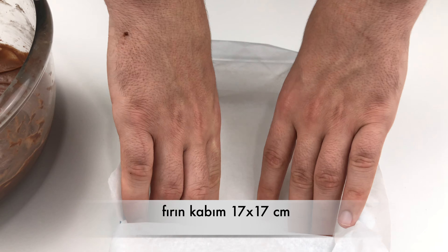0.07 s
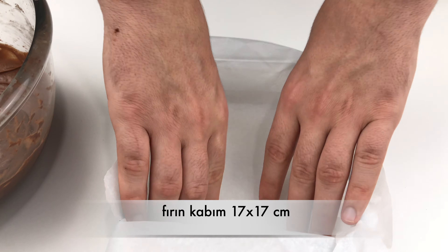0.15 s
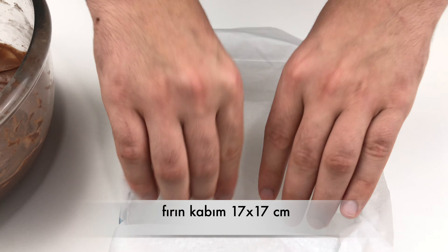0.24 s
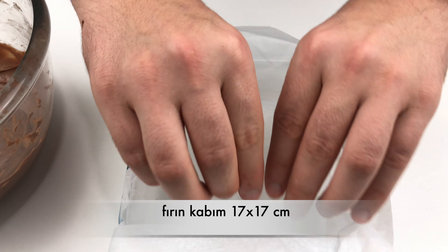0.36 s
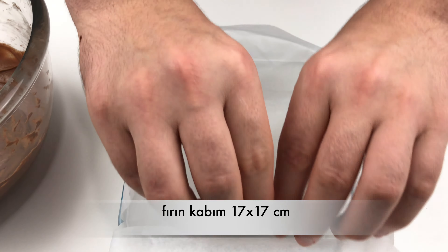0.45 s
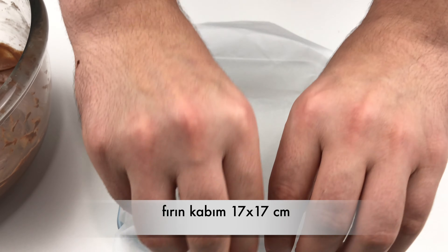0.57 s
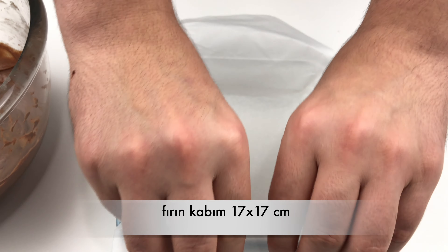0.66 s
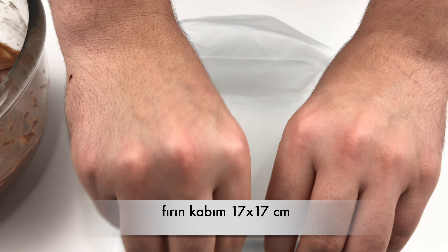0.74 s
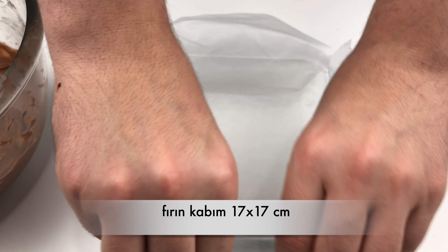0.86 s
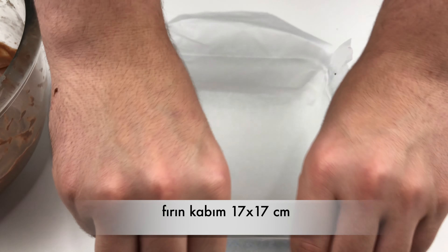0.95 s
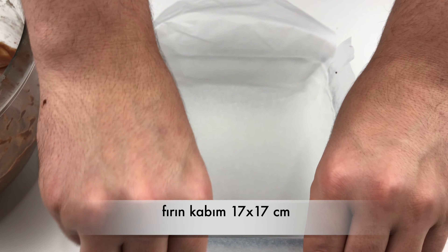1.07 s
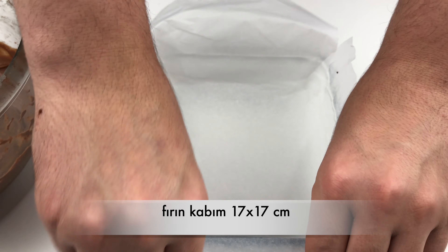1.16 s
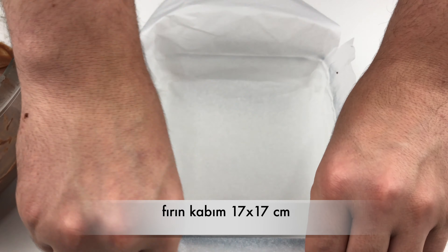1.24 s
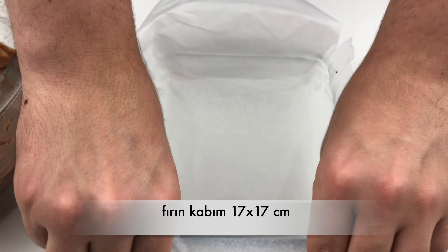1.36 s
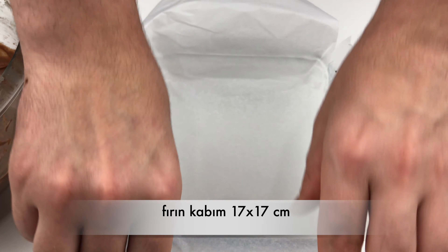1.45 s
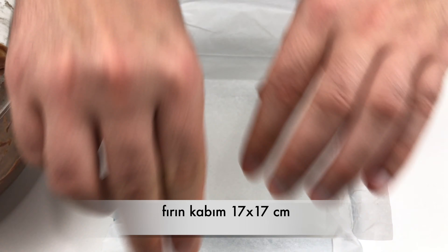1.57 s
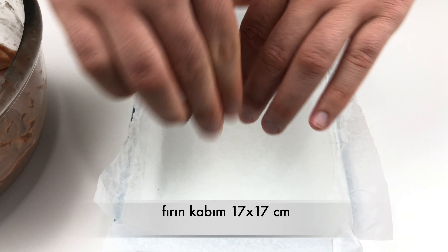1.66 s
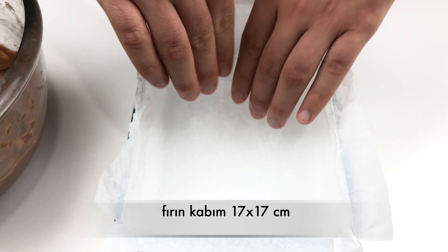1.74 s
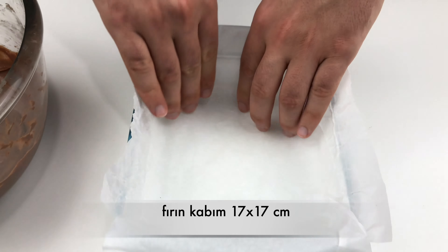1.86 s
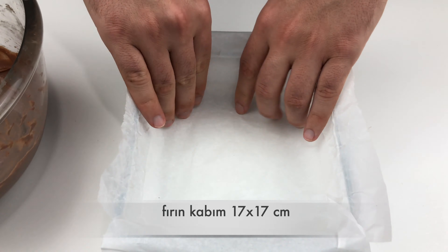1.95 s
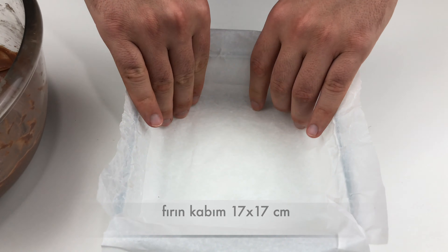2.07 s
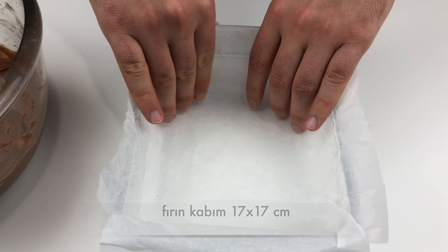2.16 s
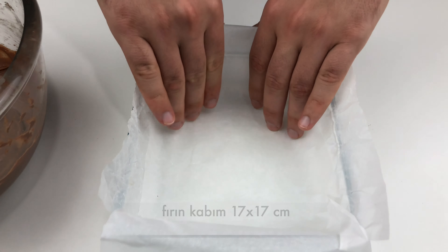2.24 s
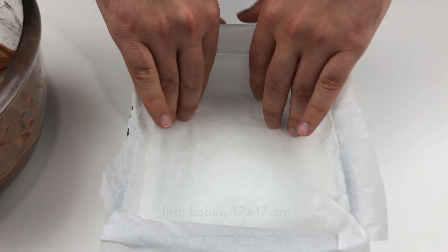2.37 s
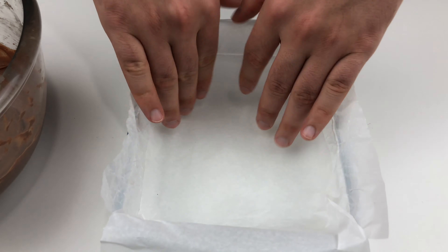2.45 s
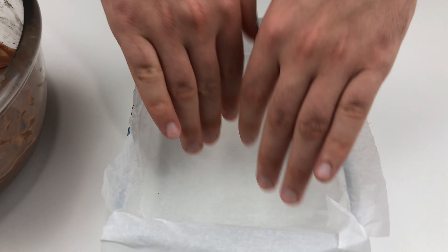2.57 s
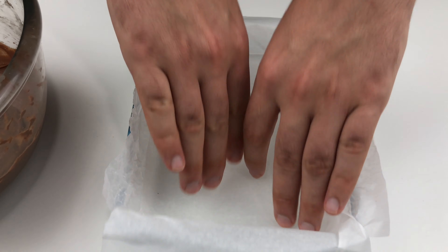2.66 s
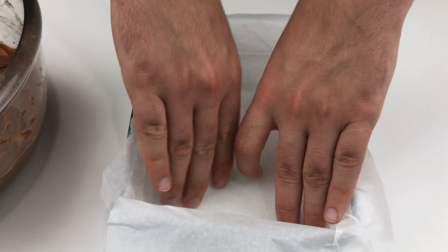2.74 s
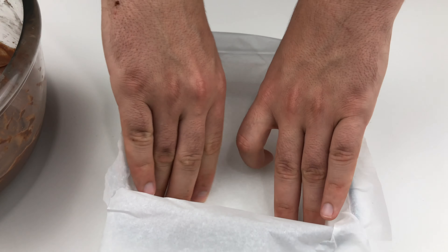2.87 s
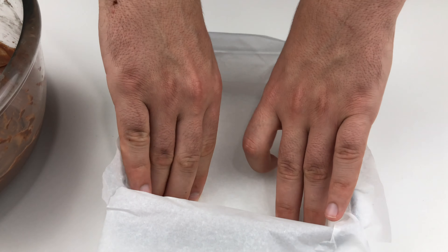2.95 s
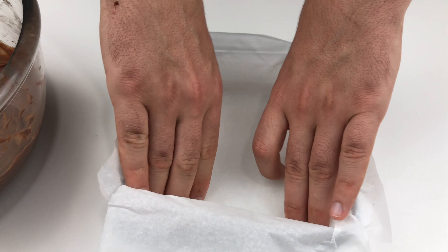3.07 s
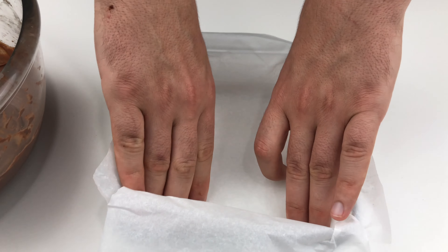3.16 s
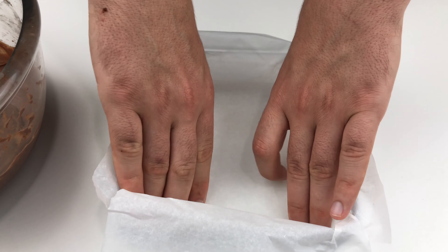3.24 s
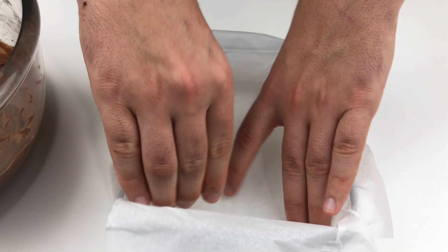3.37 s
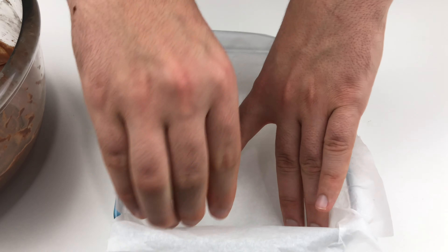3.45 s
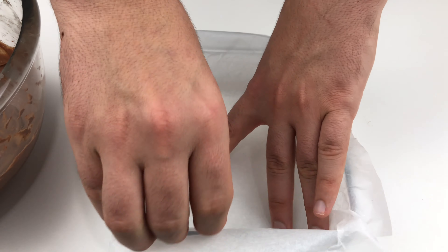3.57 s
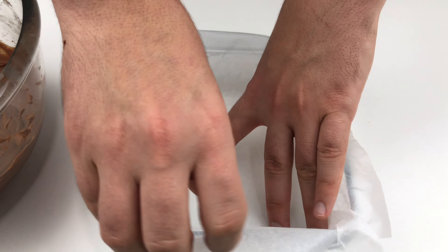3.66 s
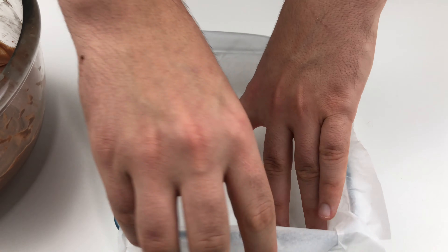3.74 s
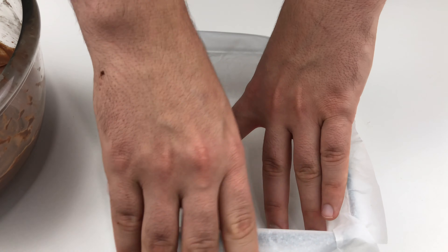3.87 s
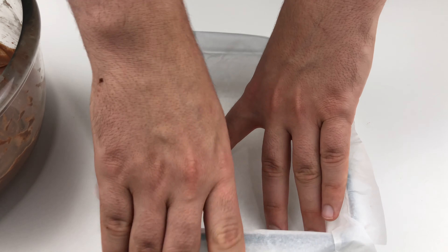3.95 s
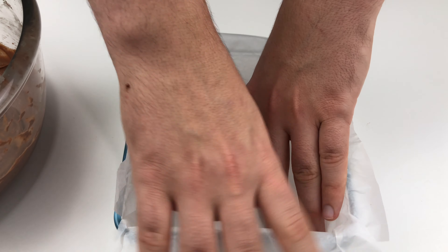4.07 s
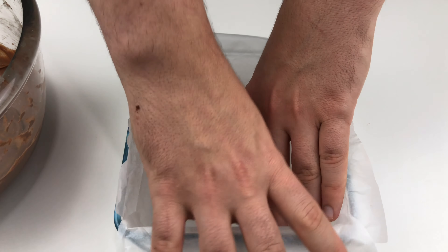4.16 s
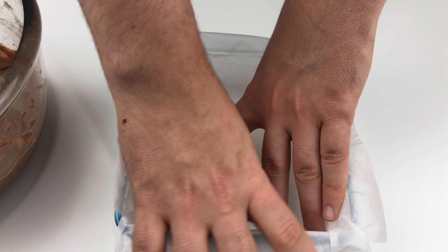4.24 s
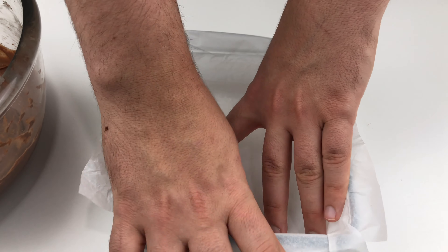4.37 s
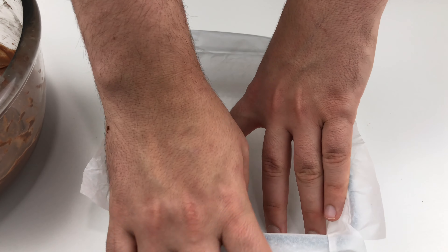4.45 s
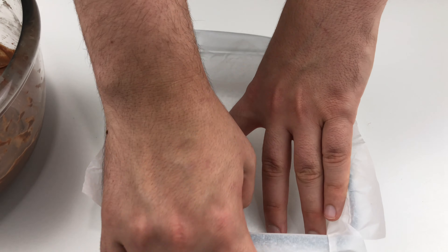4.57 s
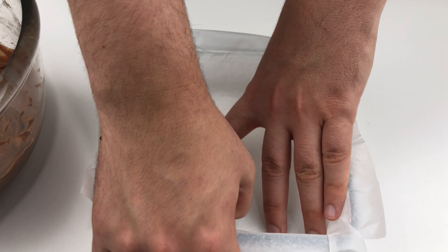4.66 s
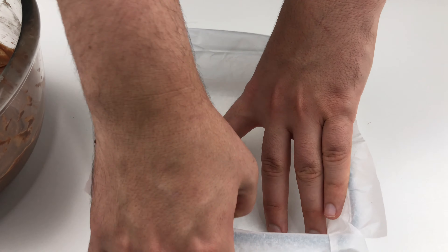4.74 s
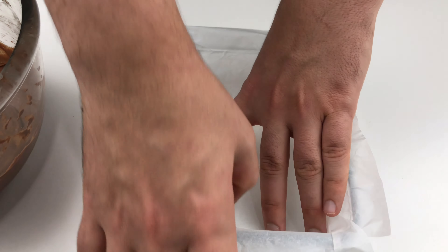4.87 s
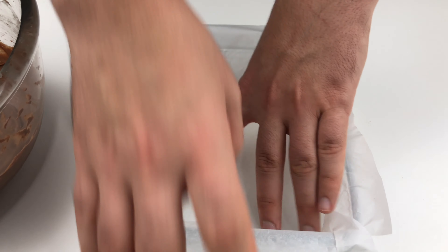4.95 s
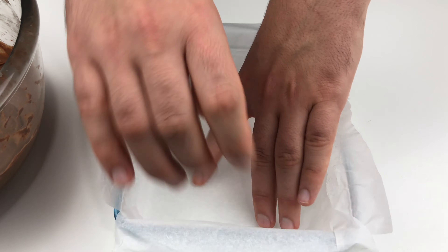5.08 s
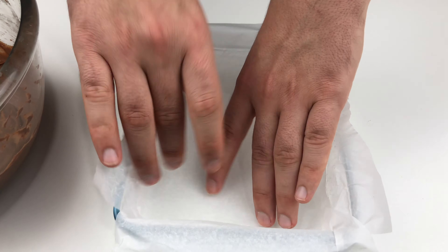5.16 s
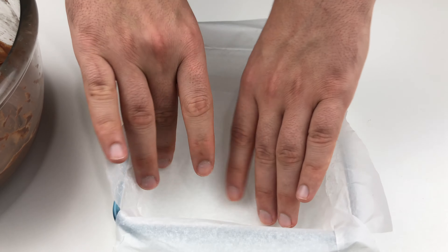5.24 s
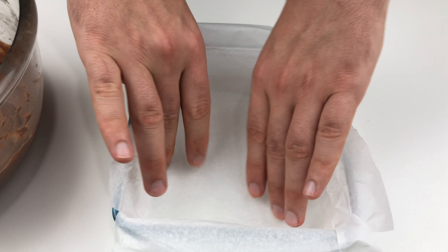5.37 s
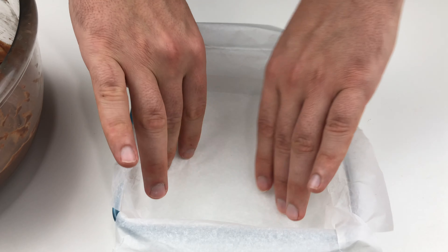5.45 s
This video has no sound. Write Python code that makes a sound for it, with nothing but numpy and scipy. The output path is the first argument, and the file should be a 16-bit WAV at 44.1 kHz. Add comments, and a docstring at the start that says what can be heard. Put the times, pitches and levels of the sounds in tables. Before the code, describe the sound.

Close-miked paper crinkling in a small, quiet kitchen: bright, brittle crackles, sharp pops and brief sliding hiss as the sheet is folded into a dish. Strong bursts come early, a short lull follows before two seconds, then uneven handling continues and fades to small crackles. Low, hollow thuds of the dish and soft fingertip pads sit underneath.

```python
"""A stiff sheet of baking paper is pressed by two hands into a glass dish, close to the microphone.
Its facets buckle as filtered noise bursts with short modes: sharp snaps over swarms of small crackles.
Sliding on the glass adds hiss, made of noise with drifting resonances. The dish knocks on a hollow worktop
as a sum of decaying modes, and fingertips pad on it as swells of low noise.
Weak early echoes and a decaying noise tail form the small kitchen, over faint steady air noise."""
import sys
import numpy as np
from scipy import signal
from scipy.fft import rfft, irfft, next_fast_len
from scipy.io import wavfile
from scipy.ndimage import uniform_filter1d, map_coordinates

SR = 44100
rng = np.random.default_rng(int(sys.argv[2]) if len(sys.argv) > 2 else 0)


def store_pcm(level_fs):
    """Save levels as 16-bit WAV."""
    pcm = np.round(np.clip(level_fs, -1, 1) * 32767).astype(np.int16)
    wavfile.write(sys.argv[1], SR, np.atleast_2d(pcm).T)


N = 242991  # length in samples

# spectrum of a sharp crack in the paper: f/Hz, relative level/dB per Hz
CRACK_SPECTRUM = [(60, -66), (300, -17), (1000, -11.5), (1500, -10.5), (2300, -9), (3300, -2), (4300, 0.5),
                  (6000, -1.5), (8000, -4.5), (11500, -6), (14000, -3), (15500, -6.5)]
# spectrum of a flapping panel of paper: f/Hz, relative level/dB per Hz
FLAP_SPECTRUM = [(30, -44), (90, -27), (150, -12), (300, -9), (500, -12), (800, -7), (1100, -6), (1400, 2),
                 (1750, -4), (2300, -8.5), (4000, -12), (9000, -64)]


def amp(db):
    """Level to amplitude: 20 dB is a factor of ten."""
    return 10 ** (np.asarray(db) / 20)


def unit(x):
    """Normalisation to an rms of 1, that is, unit mean power."""
    return x / np.sqrt(np.mean(x ** 2) + 1e-20)


def along(points, hz):
    """Interpolation of (f/Hz, value) points on a logarithmic frequency axis."""
    f, value = np.transpose(points)
    return np.interp(np.log(hz + 1), np.log(f), value)


def wobble(rate):
    """Spline interpolation of Gaussian knots, rate of them a second: a smooth random curve."""
    knots = rng.standard_normal(int(N * rate / SR) + 4)
    return map_coordinates(knots, [np.arange(N) * rate / SR])


def add(track, s, sound):
    """Superposition: mix a sound into the track at time s."""
    part = track[max(round(s * SR), 0):][:len(sound)]
    part += sound[:len(part)]


def coloured(x, spectrum):
    """Minimum-phase filtering: folding the cepstrum makes the given spectrum causal."""
    m = 2 * next_fast_len(len(x))
    cepstrum = irfft(np.log(amp(along(spectrum, np.fft.rfftfreq(m, 1 / SR)))))
    cepstrum[1:m // 2] *= 2
    cepstrum[m // 2 + 1:] = 0
    return irfft(rfft(x, m) * np.exp(rfft(cepstrum)))[:len(x)]


def noise(spectrum):
    """Spectral shaping of white noise, to an rms of 1."""
    return unit(coloured(rng.standard_normal(N), spectrum))


def dying(t60s, size, order):
    """Frequency-dependent damping: noise whose bands each lose 60 dB in their own t60."""
    hz, t, z = signal.stft(rng.standard_normal(size), SR, nperseg=order)
    z = z * amp(-60 * t / along(t60s, hz)[:, None])
    return signal.istft(z, SR, nperseg=order)[1][:size]


def handling():
    """Addition of powers: pushes swell and release over resting hands; gives crackle dB, flex dB, sliding."""
    # resting hands that keep the sheet crackling: start/s, end/s, crackle level/dB
    hold_rows = [(0, 0.302, -52), (.464, 0.552, -50.5), (.597, 1.502, -48), (1.795, 2.203, -48),
                 (2.27, 2.456, -49.5), (2.706, 4.954, -50), (5.125, 5.51, -57.5)]
    # pushes that fold the sheet into the dish: start t/s, length/s, crackle level at the end/dB,
    # flexing over crackle/dB, release/dB per s, sliding share (0-1)
    push_rows = [(0.146, 0.078, -41.5, -14, 253, 0.4), (.597, 0.11, -33.5, -2, 900, 0.26),
                 (0.848, 0.041, -35, -10.5, 157, 0.04), (0.957, 0.11, -32.5, -9, 137, 0),
                 (1.219, 0.036, -34, -11, 227, 0.02), (1.408, .05, -49.5, 0.5, 130, .1),
                 (1.809, .1, -30.5, -10, 139, 0), (2.026, 0.025, -39, -8.5, 148, 0),
                 (2.137, 0.044, -48, -2, 300, 0.4), (2.269, 0.022, -33, -12.5, 172, 0),
                 (2.399, 0.049, -44.5, -2.5, 256, 0), (2.701, 0.11, -35, -8, 109, 0.48),
                 (3.105, 0.026, -43, -15.5, 136, 0.3), (3.198, 0.077, -44, -20, 28, 0.38),
                 (3.434, 0.066, -37.5, -8.5, 120, 0.62), (3.734, .027, -29.5, -9, 118, 0),
                 (3.785, 0.063, -35.5, -3, 149, 0.4), (4.037, 0.021, -40.5, -3, 350, 0),
                 (4.144, .045, -32.5, -4, 211, 0), (4.251, 0.095, -38.5, -7.5, 170, 0.3),
                 (4.436, 0.022, -42, -4.5, 246, 0.3), (4.798, .03, -49.5, -5.5, 67, 0.6),
                 (5.222, 0.034, -48, -6.5, 241, 0.2), (5.438, 0.048, -46, -11.5, 100, 0)]
    onset_s, swell_db = 0.0043, 8  # each push catches the sheet at once, then swells to its end
    settle_db_per_s = 199  # the sheet calms down once the hands lift
    rest_db = -81  # left alone, it still creeps
    hold_flex_db = -3.5  # wide panels against fine crackle under resting hands
    t = np.arange(N) / SR

    def catch(start):
        return np.clip((t - start) / onset_s, 0, 1)

    crackle = amp(rest_db) ** 2
    for start, end, db in hold_rows:
        level_db = db - settle_db_per_s * np.maximum(t - end, 0)
        crackle = crackle + catch(start) * amp(level_db) ** 2
    flex, slide = crackle * amp(hold_flex_db) ** 2, 0
    for start, length, db, flex_db, release, sliding in push_rows:
        to_go = np.clip(1 - (t - start) / length, 0, 1)
        since_end = np.maximum(t - start - length, 0)
        power = catch(start) * amp(db - swell_db * to_go - release * since_end) ** 2
        crackle = crackle + power
        flex = flex + power * amp(flex_db) ** 2
        slide = slide + power * np.clip(sliding, 0, 1)
    return 10 * np.log10(crackle), 10 * np.log10(flex), slide / crackle


def facet(spectrum, click_db, click_s, vary_db, size=2048, count=9):
    """Impulsive excitation of a plate: one buckle of energy 1, a click and the ring of random modes."""
    # decay of a paper facet: f/Hz, t60/s
    facet_t60 = [(300, 0.13), (1400, 0.027), (3500, 0.022), (8000, 0.058), (15000, 0.0039)]
    t = np.arange(size) / SR
    click = 1 + amp(click_db) * np.exp(-t / click_s)
    burst = dying(facet_t60, size=size, order=64) * click
    hz = np.exp(rng.uniform(np.log(900), np.log(12000), (count, 1)))
    t60 = 0.028 * (hz / 1500) ** -.4  # higher modes die sooner
    modes = np.sqrt(hz / 1500) * amp(-60 * t / t60) * np.sin(2 * np.pi * hz * t)
    varied = [(f, db + vary_db * rng.standard_normal()) for f, db in spectrum]
    sound = coloured(burst + amp(-7.5) * modes.sum(0), varied)
    return sound / np.linalg.norm(sound)


def snaps(creases, count=3):
    """Snap-through buckling: quick pops around a main crack, and a flap of the panel beside it."""
    crack_gain_db, pop_gain_db, flap_gain_db = 10.5, -3, 19  # added to each row's levels
    out = np.zeros(N)
    for s, crack_db, flap_db in creases:
        crack = facet(CRACK_SPECTRUM, click_db=16.5, click_s=0.00069, vary_db=4.0)
        add(out, s + 0.001004, amp(crack_db + crack_gain_db) * crack)
        for lag in rng.uniform(0, .006, count):
            pop_db = crack_db + pop_gain_db + rng.normal(0, 3.0)
            pop = facet(CRACK_SPECTRUM, click_db=14.5, click_s=0.00051, vary_db=0.5)
            add(out, s + lag, amp(pop_db) * pop)
        flap = facet(FLAP_SPECTRUM, click_db=1, click_s=0.0013, vary_db=1.0)
        add(out, s + 0.00154, amp(flap_db + flap_gain_db) * flap)
    return out


def main_creases():
    """Snap-through instability: the creases that stand out of the rustle, as rows for snaps()."""
    # onset t/s, relative crack level/dB, relative flap level/dB
    return [(0.0704, -28, -64), (0.0864, -25, -63), (0.1544, -27.5, -61), (0.2274, -19, -47),
            (0.3696, -34.5, -64), (0.473, -33, -48), (0.5382, -22, -40), (0.5937, -23.5, -42),
            (0.606, -20.5, -42), (0.6664, -14, -29), (0.7532, -21, -38), (0.8934, -19, -33),
            (0.9569, -24, -32), (0.9884, -26, -35.5), (1.049, -11.5, -34.5), (1.0695, -20, -32),
            (1.1313, -17.5, -28), (1.2519, -16, -37.5), (1.3385, -29.5, -53), (1.4563, -24, -48),
            (1.5335, -25, -45), (1.6123, -30, -40), (1.702, -45, -49), (1.9565, -16.5, -47),
            (2.1455, -25.5, -47), (2.297, -17, -45), (2.387, -13.5, -47), (2.5451, -45, -66),
            (2.7051, -22, -35.5), (2.9492, -21.5, -51), (3.1211, -17, -40), (3.179, -23.5, -44),
            (3.2196, -17, -40), (3.4184, -23.5, -53), (3.4665, -17, -51), (3.5401, -16, -35),
            (3.5907, -17.5, -38.5), (3.6212, -24.5, -38), (3.7353, -23, -39), (3.8696, -14, -24.5),
            (3.9486, -17.5, -39), (4.1752, -12.5, -39), (4.269, -15, -31.5), (4.3478, -22.5, -35),
            (4.4481, -26, -27.5), (4.4581, -17, -35), (4.6367, -23.5, -43), (4.6849, -26, -36),
            (4.7218, -14.5, -32), (4.81, -25.5, -44), (5.009, -24.5, -38.5), (5.0404, -23, -36.5),
            (5.1885, -27, -49), (5.3894, -25.5, -43.5), (5.4829, -24.5, -48)]


def stray_creases(crackle_db):
    """Poisson process: lesser creases pop at random, as hard as the sheet is worked; rows for snaps()."""
    rate_per_s = 26
    rise_db, spread_db, top_db = 18.5, 2, -24  # rise over the crackle, scatter, ceiling
    flap_db = -19  # flap against crack
    at = np.flatnonzero(rng.random(N) < rate_per_s / SR)
    size_db = np.minimum(crackle_db + rise_db + spread_db * rng.standard_normal(N), top_db)
    return [(i / SR, size_db[i], size_db[i] + flap_db) for i in at]


def swarm(spectrum, level_db, rate, spread_db, clump_db, click_db, count=110):
    """Inhomogeneous Poisson process: small buckles in avalanches, more of them under harder work."""
    flow = amp(.45 * (level_db - level_db.max()) + clump_db * wobble(110))
    flow *= rate / flow.mean()  # buckles per second
    at = np.flatnonzero(rng.random(N) < flow / SR)
    sizes = unit(amp(spread_db * np.minimum(rng.exponential(size=N)[at], 2.5)))
    # dividing out the local rate lets the summed power follow level_db
    sizes *= (amp(level_db) * np.sqrt(SR / uniform_filter1d(flow, size=1024)))[at]
    facets = np.array([facet(spectrum, click_db, click_s=0.0004, vary_db=4.5) for _ in range(count)])
    # the fold travels over the sheet, so only a few facets are at work at one time
    nearby = at * count / N + 1.2 * rng.standard_normal(N)[at]
    which = np.floor(nearby).astype(int) % count
    samples = at[:, None] + np.arange(facets.shape[1])
    return np.bincount(samples.ravel(), (sizes[:, None] * facets[which]).ravel(), N)[:N]


def sliding_noise(spectrum, patchy_db):
    """Friction noise of rms 1: the sheet keeps changing shape, so its resonances come and go."""
    z = signal.stft(noise(spectrum), nperseg=512)[2]
    field = uniform_filter1d(rng.standard_normal(z.shape), size=5, axis=0)  # smooth over frequency
    field = uniform_filter1d(field, size=9, axis=1)  # and over time
    return unit(signal.istft(z * amp(patchy_db * unit(field)), nperseg=512)[1][:N])


def rustle(crackle_db, flex_db, sliding):
    """Buckling against friction: crackle and flexing panels, which sliding turns partly into hiss."""
    hiss_db, scrape_db = -11, -10.5  # friction against crackle and against flexing
    slide_rise_db = 13.5  # rise of the friction in a full slide
    crackle = swarm(CRACK_SPECTRUM, crackle_db - .2, rate=400, spread_db=6, clump_db=3.5, click_db=11.5)
    flex = swarm(FLAP_SPECTRUM, flex_db, rate=190, spread_db=3.5, clump_db=4, click_db=5.5)
    grip_db = 2.6 * wobble(160) + slide_rise_db * sliding
    hiss = amp(crackle_db + hiss_db + grip_db) * sliding_noise(CRACK_SPECTRUM, patchy_db=3.0)
    scrape = amp(flex_db + scrape_db + grip_db) * sliding_noise(FLAP_SPECTRUM, patchy_db=6.0)
    return amp(-3 * sliding) * (crackle + flex) + hiss + scrape


def knocks():
    """Modal synthesis: a brief clunk rings dish and worktop, and hard knocks reach the upper modes."""
    # the dish rocks onto the worktop: t/s, relative level/dB, hardness as relative upper-mode level/dB
    knock_rows = [(0.223, -25.5, -7.5), (0.676, -16.5, -2), (1.43, -24.5, -7.5), (2.811, -17.5, -0.5),
                  (3.066, -40.5, -15.5), (3.176, -32, -9.5), (3.355, -21, -7), (3.618, -30, -3),
                  (3.986, -30.5, -1), (4.043, -23.5, -5), (4.28, -30, -3.5), (4.843, -25.5, -7),
                  (4.889, -31.5, -7.5)]
    # modes of the dish on the worktop: f/Hz, relative level/dB, t60/s
    dish_modes = [(77, -11.5, 0.19), (127.5, -14.5, 0.42), (140.8, -4, 0.32), (180.75, -4.5, 0.39),
                  (202.5, 1.5, 0.21), (228.3, -6, 0.3), (255, -7, 0.18), (275.7, -1, 0.095),
                  (294.5, -11, 0.3), (347.6, -8, 0.19), (364.4, -10.5, 0.2), (417.6, -10, 0.19),
                  (459, -13.5, 0.19), (513, -24, 0.26), (537.6, -12.5, 0.14), (600, -31, 0.15),
                  (607, -12.5, 0.12), (620.6, -18, 0.15), (723, -14, 0.13), (803, -28, 0.37)]
    out, t = np.zeros(N), np.arange(SR // 2) / SR
    hz, mode_db, t60 = np.transpose(dish_modes)[:, :, None]
    upper = np.clip((hz - 300) / 280, 0, 1)
    for s, db, hard_db in knock_rows:
        strength = mode_db + upper * (hard_db + 7.0) + 2 * rng.standard_normal(hz.shape)
        # the hands shift the upper modes
        loaded_hz = hz * (1 + 0.014 * upper * rng.standard_normal(hz.shape))
        phase = (0.81 + upper) * rng.standard_normal(hz.shape)
        modes = amp(strength - 60 * t / t60) * np.cos(2 * np.pi * loaded_hz * t + phase)
        ring = np.sum(modes, axis=0)
        ring *= 1 - np.exp(-t / 0.0021)  # the heavy worktop takes a moment to swing
        clunk_hz = 586 + 14 * hard_db
        clunk = amp(hard_db + 7 - 60 * t / 0.021) * np.sin(2 * np.pi * clunk_hz * t)
        clunk *= 1 - np.exp(-t / 0.0013)
        add(out, s + 0.0018, amp(db) * (amp(-20.0) * unit(ring) + clunk))
    # the knocks carry no deep bass
    return signal.sosfilt(signal.butter(3, 90, "high", fs=SR, output="sos"), out)


def presses():
    """Soft contact excites only low frequencies: fingertips land on the lined glass with a dull swell."""
    # pushes of the fingers: start t/s, level/dB, length (twice the rise time)/s
    press_rows = [(0.659, -47, 0.046), (1.883, -38.5, 0.046), (1.964, -51.5, 0.058), (2.298, -45.5, 0.045),
                  (4.208, -57, 0.024)]
    # spectrum of a soft pad: f/Hz, relative level/dB per Hz
    pad_spectrum = [(20, -28), (45, -8.5), (80, -12), (135, -1), (195, -7.5), (260, -18.5), (500, -20),
                    (1500, -87)]
    t, push = np.arange(N) / SR, np.zeros(N)
    for s, db, length in press_rows:
        u = np.maximum(t - s, 0) / (length / 2)
        push += amp(db) * u * np.exp(1 - u)  # peaks at u = 1
    return push * noise(pad_spectrum)


def kitchen(x, walls_db, tail_db, count=10):
    """Room response by convolution: near surfaces throw back weak copies, then the room dies away."""
    # reverberation of the kitchen: f/Hz, t60/s
    room_t60 = [(150, 0.87), (1000, 0.43), (4500, 0.25), (8000, 0.17), (15000, 0.13)]
    tail = dying(room_t60, size=SR // 2, order=256)
    delayed = np.pad(tail / np.linalg.norm(tail), (SR // 200, 0))  # starts after 5 ms
    response = amp(tail_db) * delayed
    for s, strength in zip(rng.uniform(.002, 0.016, count), rng.standard_normal(count)):
        add(response, s, [amp(walls_db) * strength])
    return signal.fftconvolve(x, response)[:N]


def room_air():
    """Stationary background noise: the faint, steady air of the quiet room."""
    # spectrum of the air: f/Hz, relative level/dB per Hz
    air_spectrum = [(20, -26), (60, -8), (150, 5.5), (300, -1.5), (1000, -16), (4000, -27), (8000, -26),
                    (15000, -38)]
    return amp(-65.5) * noise(air_spectrum)


def scene():
    """Superposition of direct paper and dish, their room response and the air."""
    crackle_db, flex_db, sliding = handling()
    paper = rustle(crackle_db, flex_db, sliding)
    paper = paper + snaps(main_creases()) + snaps(stray_creases(crackle_db))
    dish = knocks() + presses()
    room = kitchen(paper + 0.8 * dish, walls_db=-47, tail_db=-17.0)
    return (paper + dish + room + room_air())[None]


def record(dry):
    """Band limitation: nothing passes at or above the limit."""
    top_hz = 16050
    m = next_fast_len(N + SR // 2)
    passes = np.fft.rfftfreq(m, 1 / SR) < top_hz
    return irfft(rfft(dry, m) * passes, m)[:, :N]


dry = scene()
out = record(dry)
store_pcm(out)
```